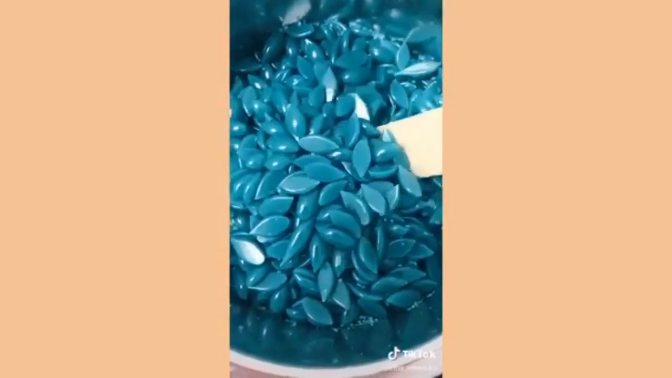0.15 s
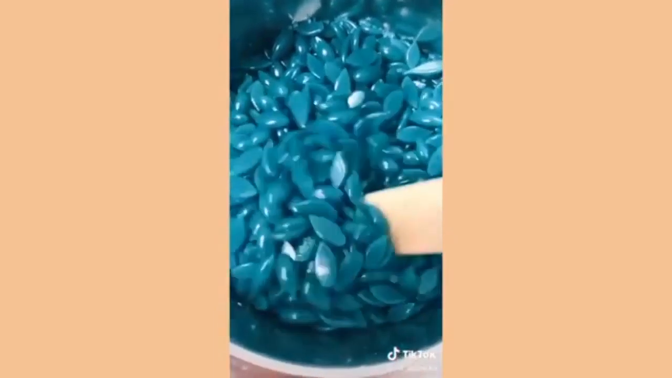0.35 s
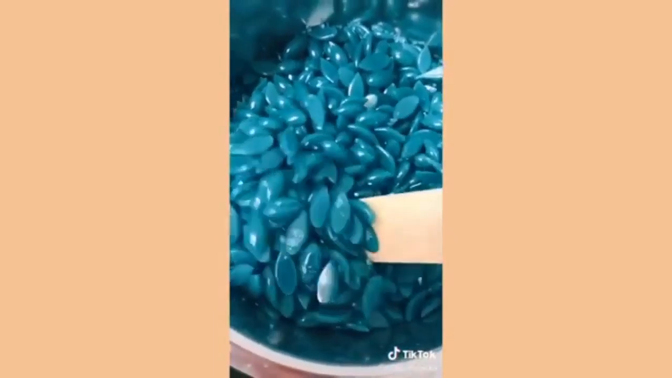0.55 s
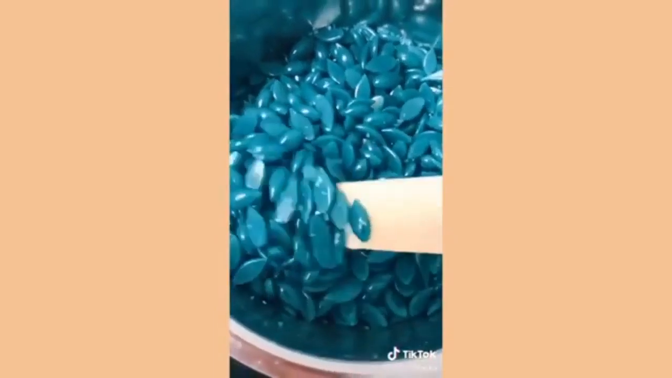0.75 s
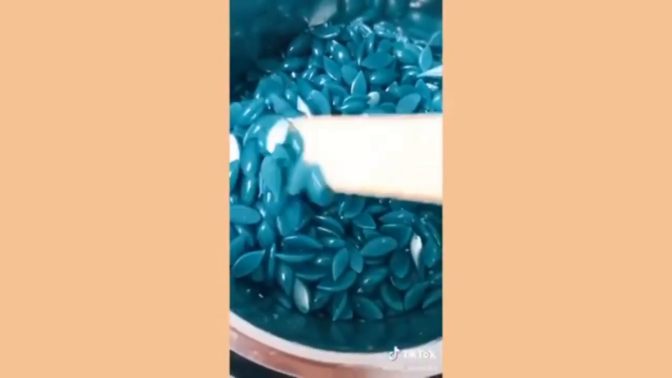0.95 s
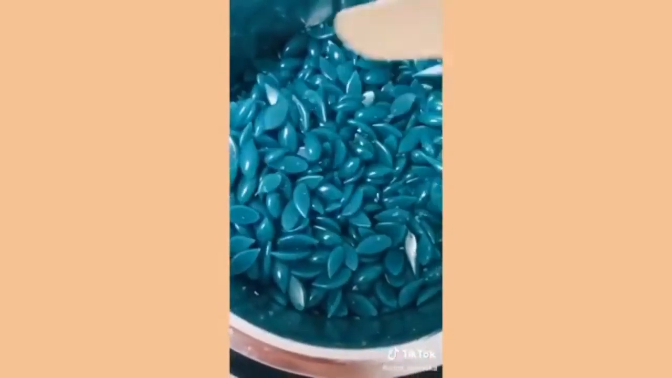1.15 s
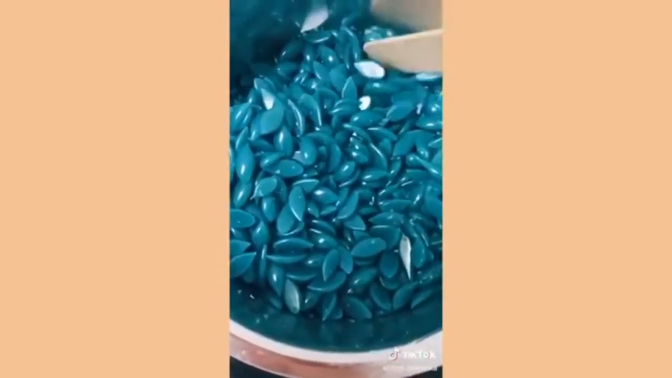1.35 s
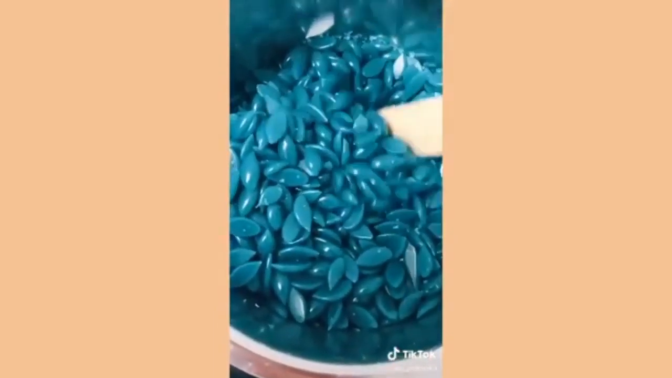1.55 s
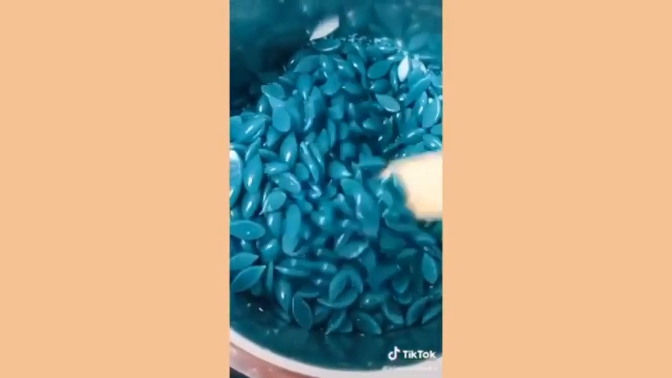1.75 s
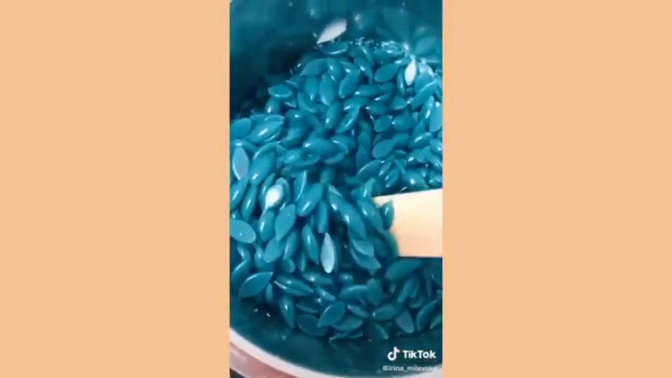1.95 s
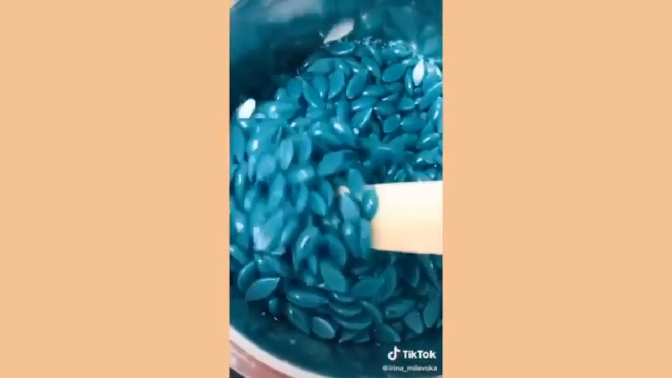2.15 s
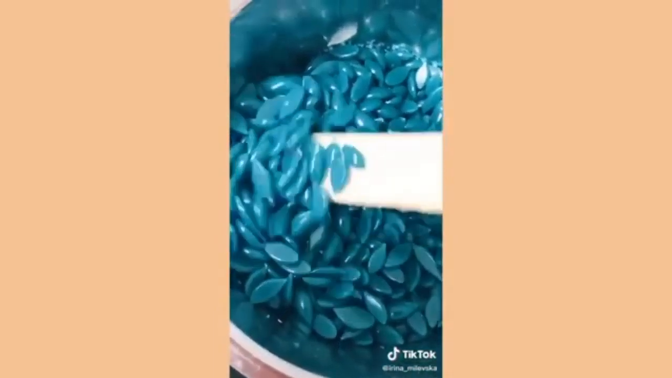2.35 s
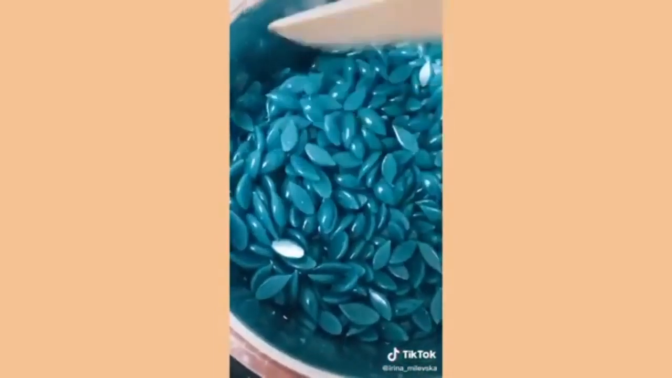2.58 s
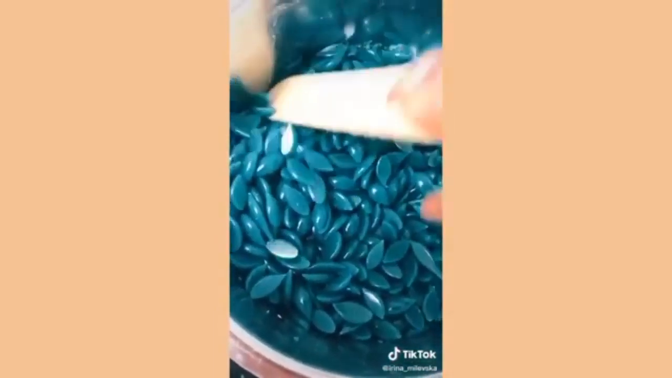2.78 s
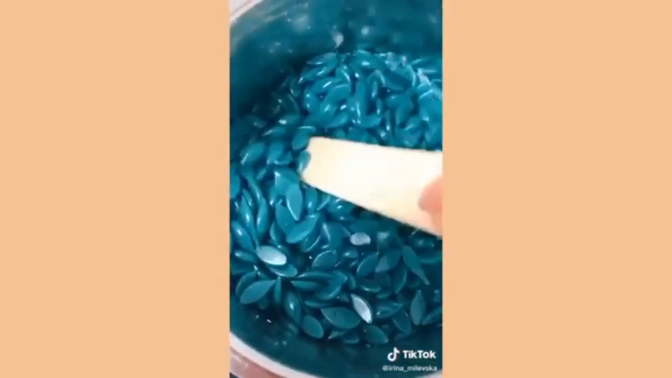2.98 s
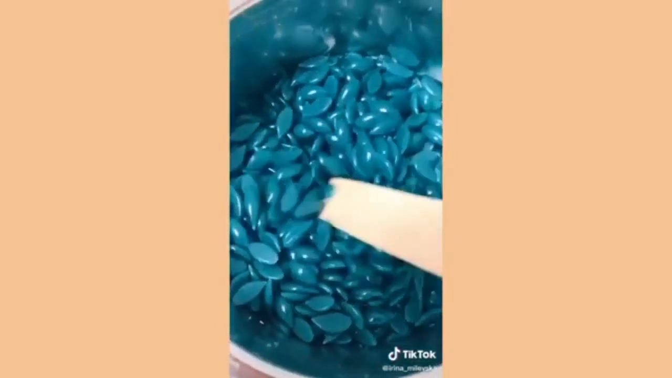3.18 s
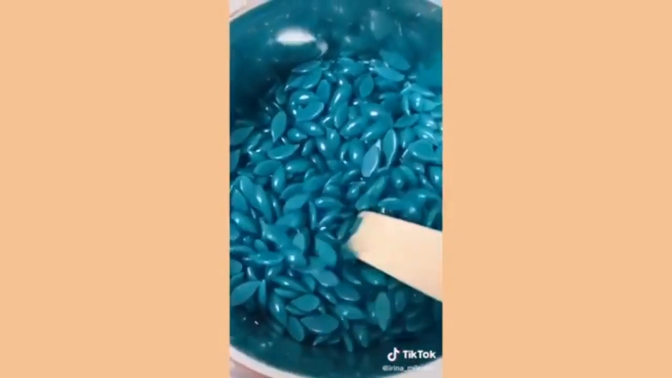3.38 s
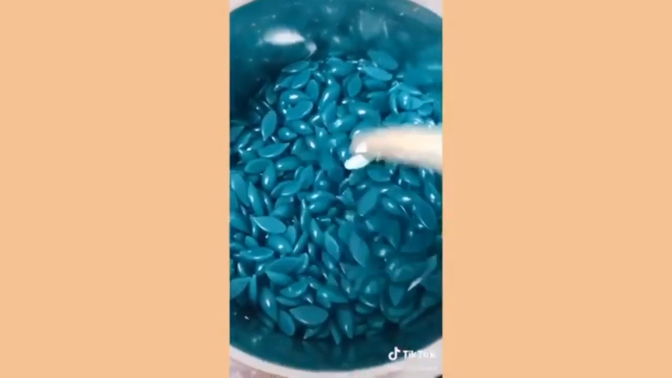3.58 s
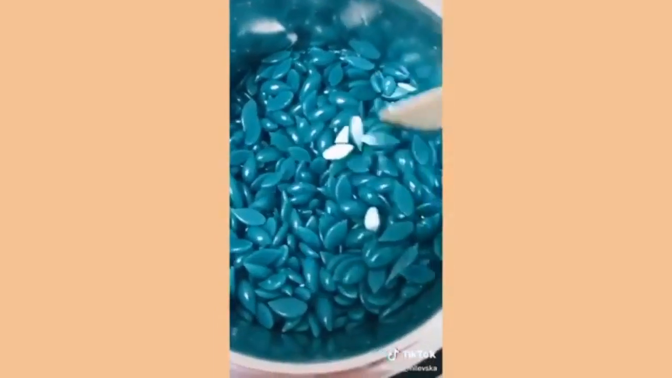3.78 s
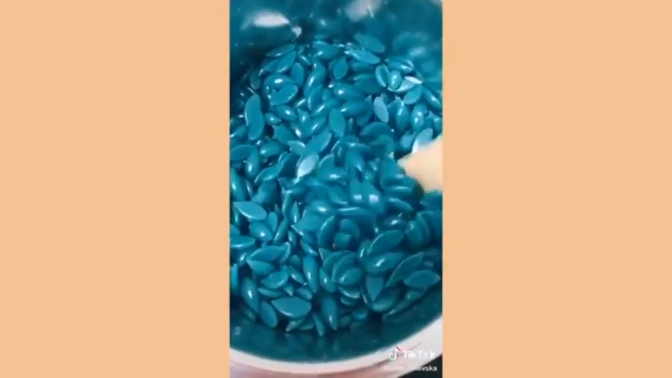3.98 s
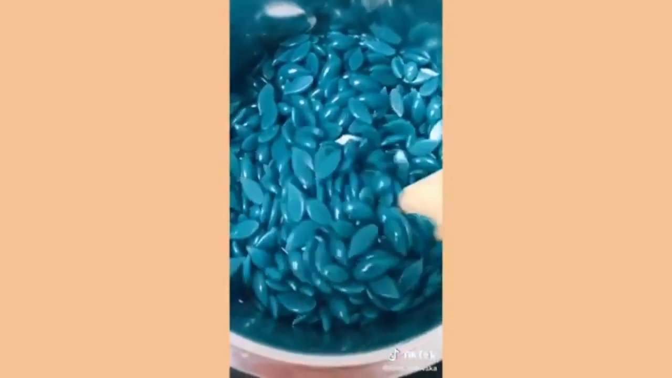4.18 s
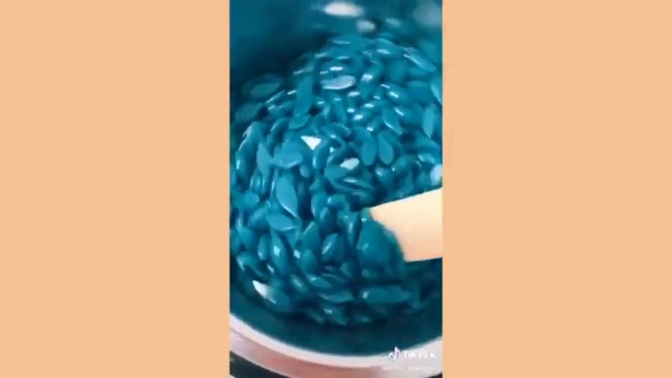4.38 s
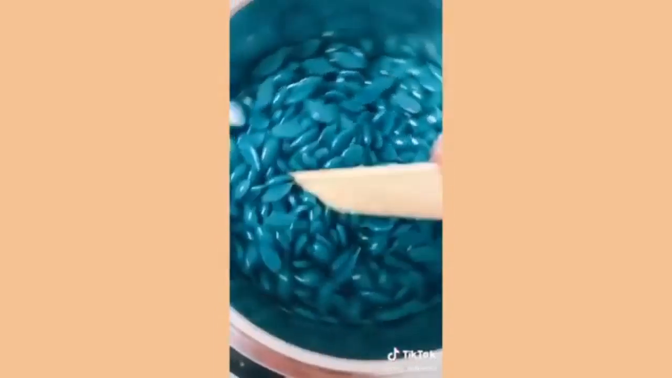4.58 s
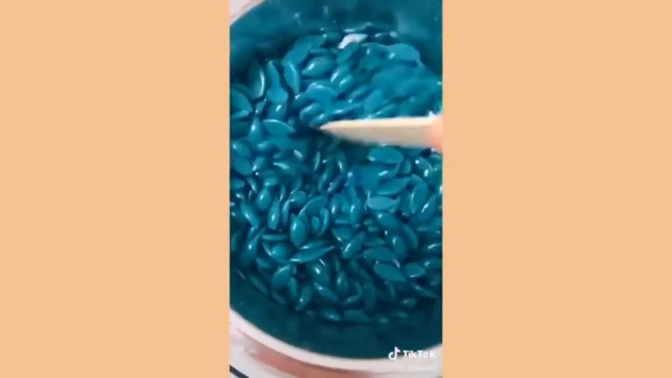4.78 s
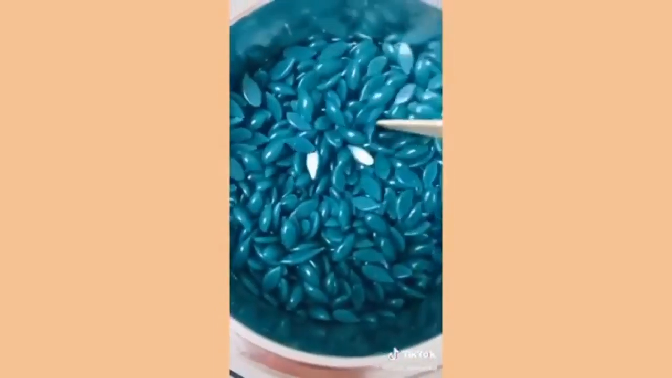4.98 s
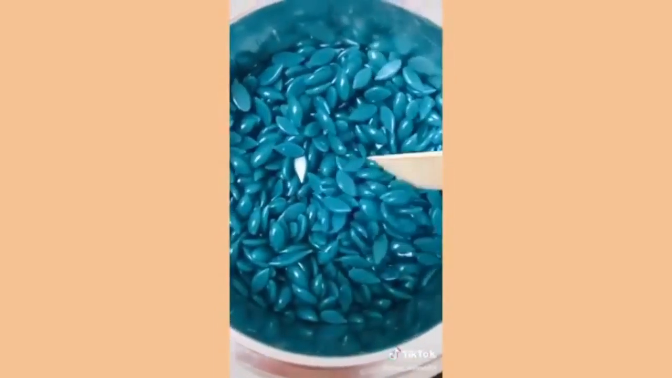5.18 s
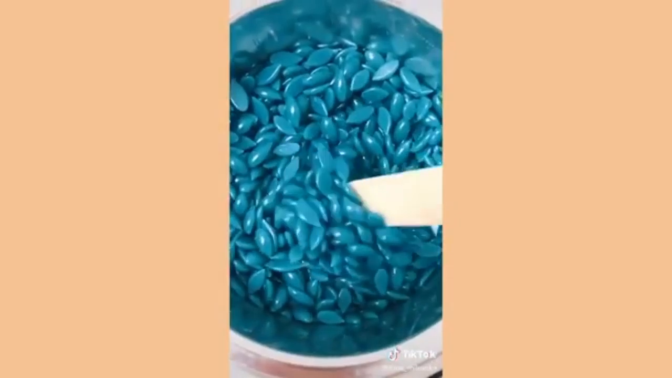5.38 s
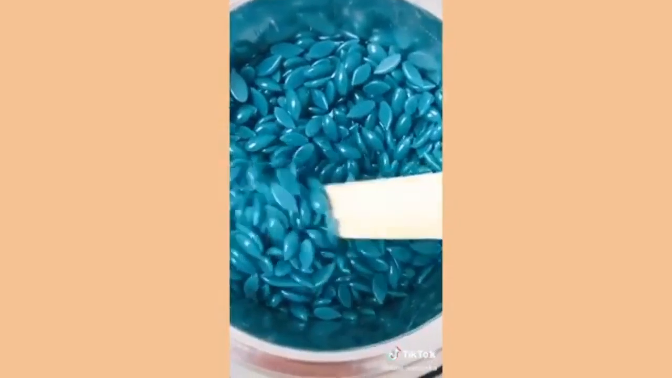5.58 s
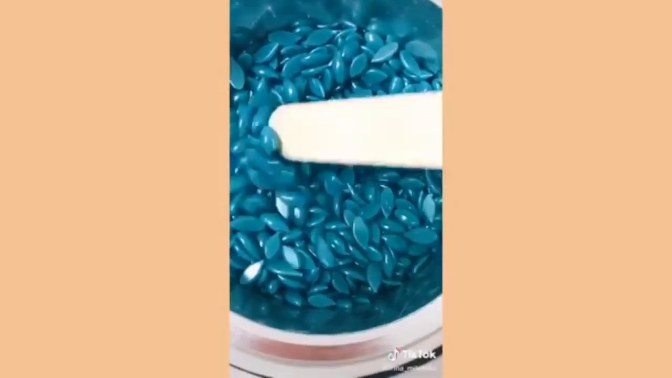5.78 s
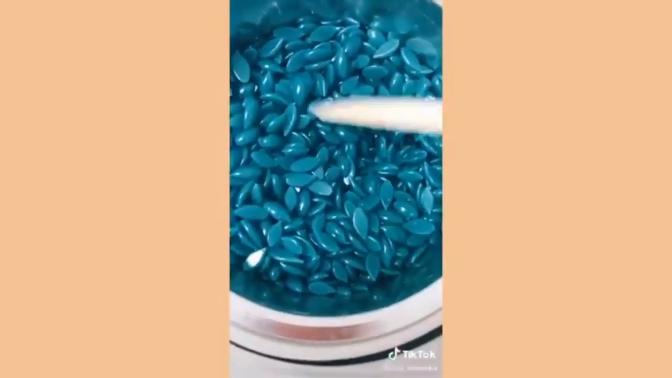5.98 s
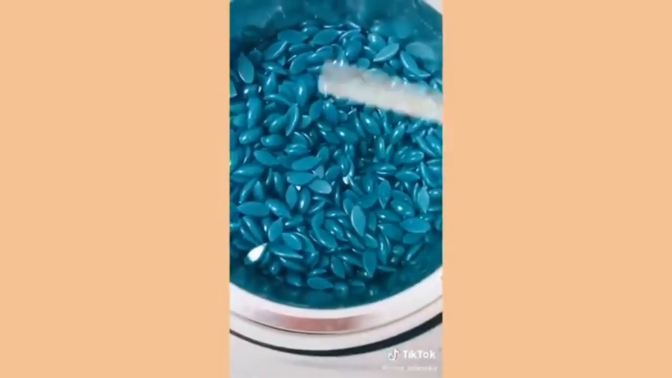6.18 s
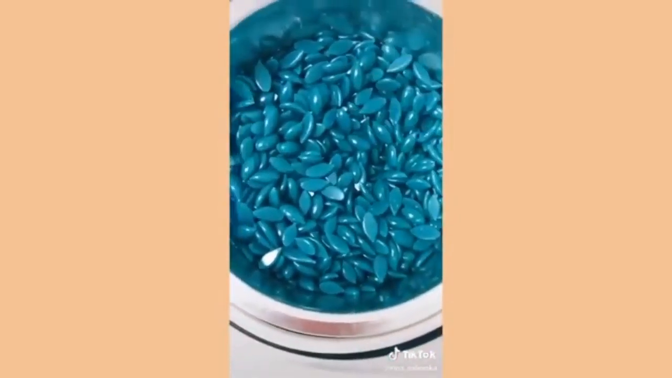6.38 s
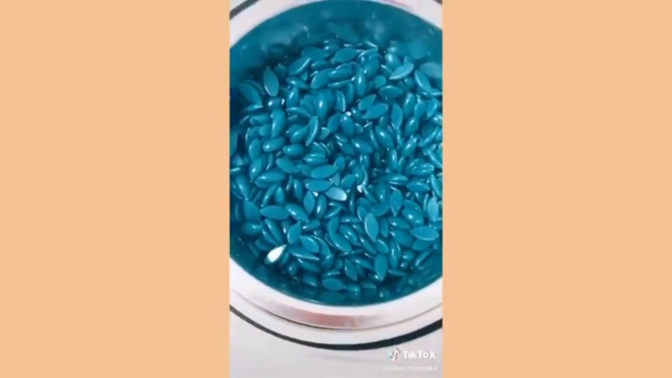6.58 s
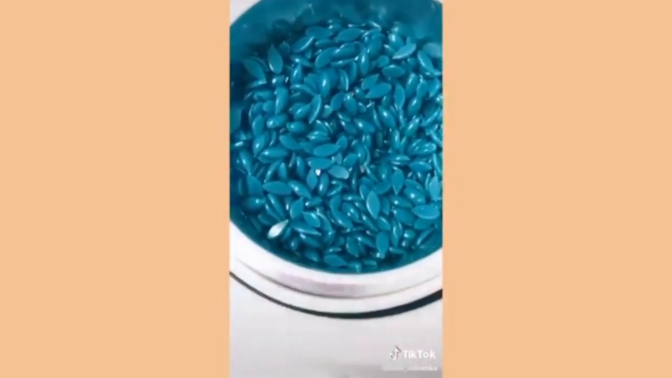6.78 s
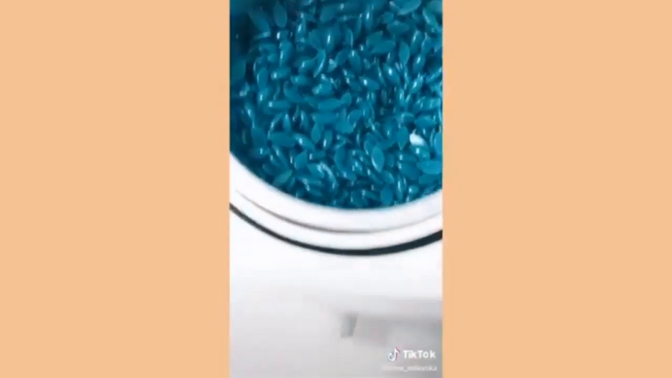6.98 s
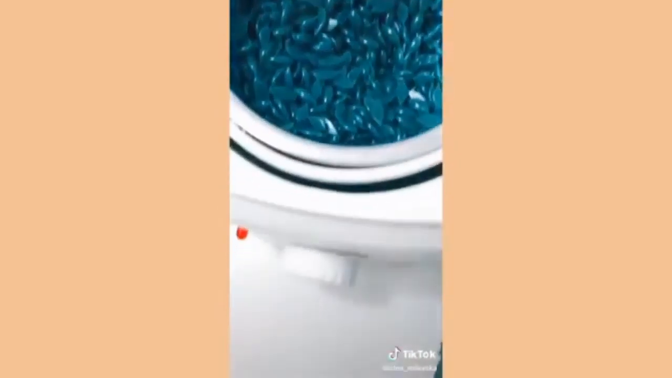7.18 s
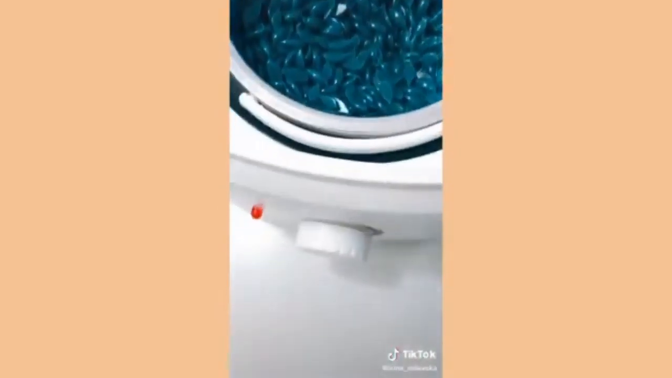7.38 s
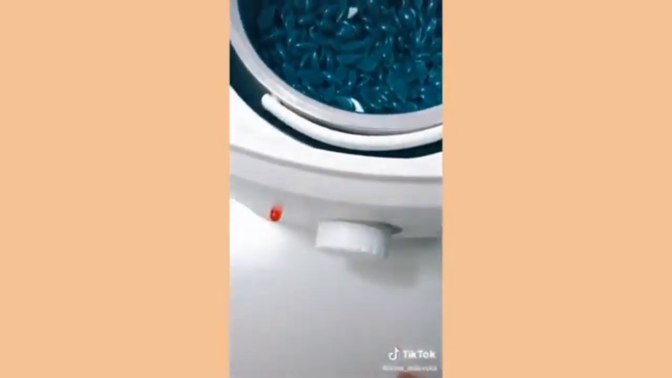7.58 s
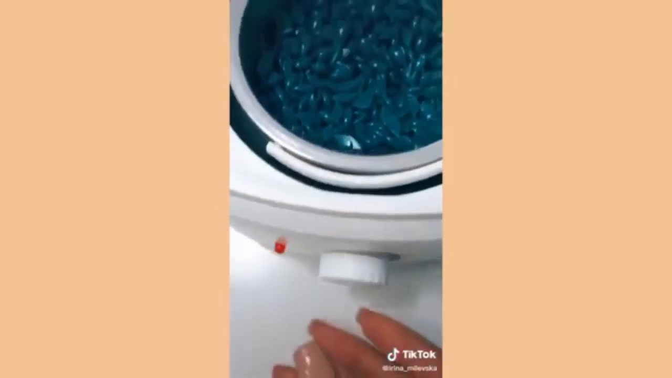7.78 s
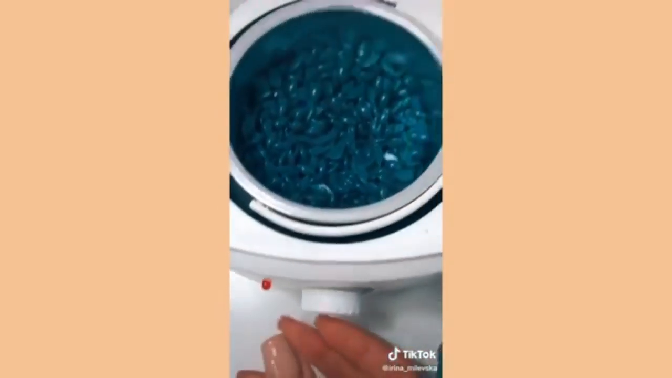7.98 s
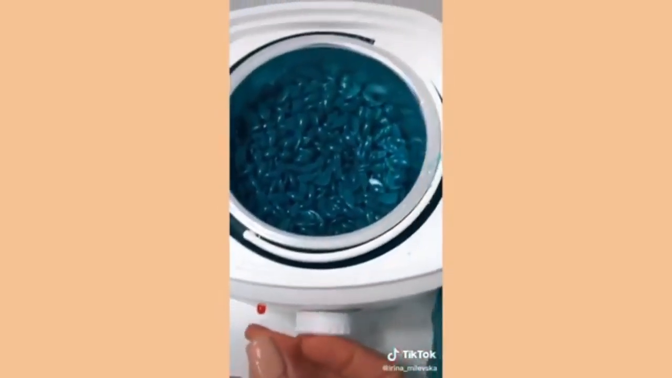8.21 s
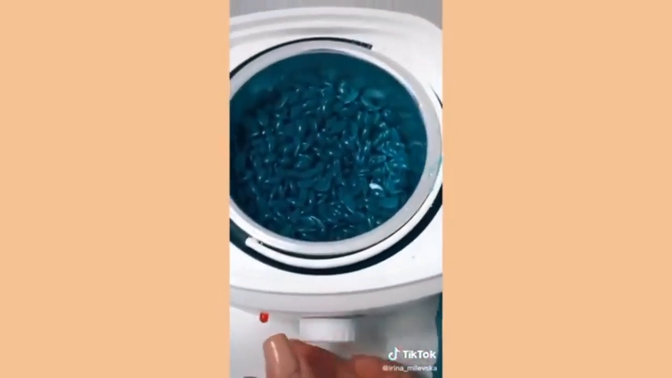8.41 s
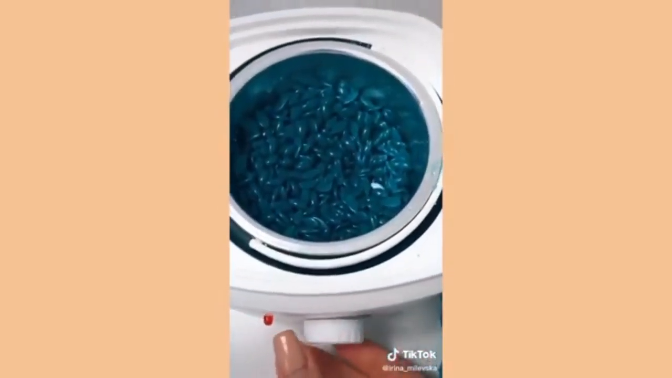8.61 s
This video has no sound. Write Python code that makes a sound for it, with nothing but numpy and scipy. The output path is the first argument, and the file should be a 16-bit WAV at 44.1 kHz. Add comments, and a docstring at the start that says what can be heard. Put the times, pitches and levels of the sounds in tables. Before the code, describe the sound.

Hard little beads are pushed around a metal pot in about ten strokes, each biting with a crunch and mostly fading, with scattered sharp clicks and dull rumbles. After six seconds it goes quiet apart from faint swishes. A bright, bouncing clack rings briefly, a hand brushes past, and a few hollow taps end it. Close microphone, small quiet room.

```python
"""In the bass-heavy air of a small room, a wooden spatula stirs hard wax beads in a warmer's metal pot.
From the start, strokes bite and mostly fade: swarms of collisions rustle, packed beads crunch and snap,
the pot rumbles and thumps in its low modes, and the blade now and then knocks on its wall.
After 5 s the flat of the blade rubs the beads, and the stirring stops near 6 s. The spatula lifts off with
soft swishes, light taps on the housing follow, and a hard clack at 7 s sets the shell ringing; a hand brushes past."""
import sys
import numpy as np
from scipy import signal
from scipy.fft import rfft, irfft
from scipy.io import wavfile
from scipy.ndimage import uniform_filter1d

SR = 44100
rng = np.random.default_rng(int(sys.argv[2]) if len(sys.argv) > 2 else 0)


def wrap_up_sound(samples):
    """Save the sound to the file named by the first command line argument, as 16-bit audio."""
    columns = np.atleast_2d(samples).T
    # keep every value between -1 and 1, then stretch to whole-number steps
    tamed = np.clip(columns, -1, 1)
    steps = np.round(tamed * 32767).astype(np.int16)
    wavfile.write(sys.argv[1], SR, steps)


N = 381465
T = np.arange(N) / SR
TICKS = np.arange(0, N / SR, .001)  # coarse time grid for the levels, in s
FILTER_SIZE = 4096
FREQS = np.maximum(np.fft.rfftfreq(FILTER_SIZE, 1 / SR), 1)
# hollow sound lies below the first edge, sparkle above the second
ZONE_EDGES_HZ = (3500, 9000)


def amp(db):
    """Level law: 20 dB is a factor of ten in amplitude."""
    return 10 ** (np.asarray(db) / 20)


def unit(x):
    """Energy normalisation: scale the sum of squares to 1."""
    return x / np.sqrt(np.sum(x ** 2))


def through(x, impulse):
    """Linear filtering: convolve a sound with an impulse response."""
    return signal.oaconvolve(x, impulse)[:len(x)]


def add(out, s, x):
    """Superposition: mix x into out at time s."""
    i = int(s * SR)
    out[i:i + len(x)] += x[:max(N - i, 0)]


def colour(points, peaks=()):
    """Spectral envelope: dB over FREQS from (f/Hz, level/dB) points and (f/Hz, width/Hz, level/dB) resonances."""
    hz, db = np.transpose(points)
    gain_db = np.interp(np.log(FREQS), np.log(hz), db)
    for f, width, peak_db in peaks:
        gain_db = gain_db + peak_db / (1 + (2 * (FREQS - f) / width) ** 2)
    return gain_db


def response(db):
    """Minimum phase: folding the cepstrum gives a causal impulse response, here of energy 1."""
    cepstrum = irfft(np.log(amp(db)))
    cepstrum[1:FILTER_SIZE // 2] *= 2
    cepstrum[FILTER_SIZE // 2 + 1:] = 0
    return unit(irfft(np.exp(rfft(cepstrum))))


def zones(db):
    """Band splitting: impulse responses for the hollow, middle and sparkling parts of a colour."""
    low, high = (1 / (1 + (FREQS / edge) ** 10) for edge in ZONE_EDGES_HZ)
    shares = (low, high - low, 1 - high)
    return [response(db + 10 * np.log10(share + 1e-7)) for share in shares]


def ring(modes, length_s):
    """Modal sum: exponentially decaying sines of alternating sign, from (f/Hz, level/dB, t60/s)."""
    t = np.arange(int(length_s * SR)) / SR
    total = 0
    for k, (hz, db, t60) in enumerate(modes):
        total = total + amp(db - 60 * t / t60) * np.sin(2 * np.pi * hz * t) * (-1) ** k
    return unit(total)


def walk(rate):
    """Random modulation: smoothed noise steps, rate per second, with standard deviation 1."""
    k = int(SR / rate)
    steps = np.repeat(rng.standard_normal(N // k + 1), k)
    x = uniform_filter1d(steps, k)[:N]
    return x / x.std()


def grains(rate, spread_db, decay_s):
    """Shot noise: the envelope of a swarm of tiny, uneven collisions, with a steady mean power."""
    sizes = amp(spread_db * np.minimum(rng.standard_normal(N), 2)) ** 2
    hits = (rng.random(N) < rate / SR) * sizes
    power = signal.lfilter([1], [1, -np.exp(-2 / (decay_s * SR))], hits) + 1e-9
    mean_power = uniform_filter1d(power, size=2200)
    return np.sqrt(power / np.maximum(mean_power, 1e-9))


def burst(shape):
    """Impulsive excitation: a brief crack of the given envelope, its energy spread evenly over frequency."""
    spectrum = rfft(shape * rng.standard_normal(len(shape)))
    local_power = uniform_filter1d(np.abs(spectrum) ** 2, size=44)
    return irfft(spectrum / np.sqrt(local_power), len(shape))


def drift(db_spread, width_hz):
    """Spectral irregularity: a random, smooth ripple over FREQS, so that no two contacts ring alike."""
    return db_spread * np.interp(FREQS, np.arange(40) * width_hz, rng.standard_normal(40))


def contacts(table, body_db, rise_s, decay_s, chatter_s, chatter_db, ripple_db, grind, lean):
    """Impact excitation: each contact may grind for an instant, cracks, and leaves a weaker chatter behind."""
    lead_s = .008  # room for the grind before the crack
    t = np.arange(SR // 30) / SR - lead_s
    after = np.maximum(t, 0)
    crack_shape = (1 - np.exp(-after / rise_s)) * np.exp(-after / decay_s)
    chatter = amp(chatter_db) * np.exp(-np.abs(t) / chatter_s) * np.where(t < 0, grind, 1)
    shape = crack_shape + chatter
    window = np.sqrt(.004 * SR)  # levels refer to the energy spread over 4 ms
    octaves = np.log2(np.clip(FREQS, 700, 5000) / 700)
    out = np.zeros(N)
    for s, db, hollow_db, sparkle_db, *_ in table:
        shares = unit(amp([hollow_db, 0, sparkle_db]))
        # with lean above 0, hollow contacts lean towards the lowest resonances
        tilt_db = lean * max(hollow_db, 0) * octaves
        parts = zones(body_db + drift(ripple_db, width_hz=550) - tilt_db)
        crack = sum(g * unit(through(burst(shape), part)) for g, part in zip(shares, parts))
        add(out, s - lead_s, amp(db) * window * crack)
    return out


# Colour of the air of the room: f/Hz, relative level/dB
AIR_COLOUR = [(20, -26.5), (32, -18.5), (50, 0.5), (150, -1), (220, -5.5), (430, -16), (770, -17.5),
              (1800, -22.5), (4000, -28), (12800, -34), (15000, -35.5)]


def room_tone():
    """Stationary noise: the quiet, bass-heavy air of the room, wandering slightly in level."""
    air = through(rng.standard_normal(N), response(colour(AIR_COLOUR)))
    return air * amp(-63 + .5 * walk(14.0))


def room(x, wet_db, t60_s, treble_t60_s, treble_db):
    """Diffuse reverberation: a tail of decaying noise in which the treble dies sooner."""
    t = np.arange(SR) / SR
    decays_s = (t60_s, (t60_s + treble_t60_s) / 2, treble_t60_s)
    levels_db = (0, treble_db / 2, treble_db)
    tail = 0
    for part, t60, db in zip(zones(0 * FREQS), decays_s, levels_db):
        tail = tail + through(rng.standard_normal(SR), part) * amp(db - 60 * t / t60)
    onset = np.clip(t / 0.0033 - .5, 0, 1)
    return x + amp(wet_db) * through(x, unit(tail * onset))


def push(start, length, attack_s, release_s, fade_db=0):
    """Driven envelope over TICKS: a push bites, changes by -fade_db per s, and dies when the blade stops."""
    t = TICKS - start
    attack = np.clip(t / attack_s, 0, 1)
    fade = amp(-fade_db * np.clip(t, 0, length))
    return attack * fade * np.exp(-np.maximum(t - length, 0) / release_s)


# Strokes of the spatula through the beads; shares are relative to the middle zone, a negative fade swells:
# t/s, length/s, rustle level/dB, fade/(dB/s), hollow share/dB, sparkle share/dB, rumble level/dB
STROKE_EVENTS = [(0.012, 0.15, -43.5, 11, 1.5, -3, -50.5), (0.254, .846, -37, 14.5, -1, -0.5, -50.5),
                 (1.345, 0.39, -42, 5.5, 1, -0.5, -44.5), (1.765, 0.51, -40.5, 19, 2, 0.5, -46),
                 (2.19, 0.46, -36, 36, -0.5, -1, -44), (2.774, .875, -37.5, 7, -2.5, 0, -49),
                 (3.763, 0.41, -43, -10, 0.5, 0.5, -49.5), (4.237, 0.31, -36, 29.5, 0.5, -2.5, -37),
                 (4.578, 0.62, -39.5, 7, -3, 0, -53.5), (5.268, 0.61, -45, 7.5, 1, 1.5, -53)]
STROKE_ATTACK_S, STROKE_RELEASE_S = 0.0092, 0.046
# Packed beads give way in a crunch: t/s, length/s, level/dB, hollow share/dB, sparkle share/dB
CRUNCH_EVENTS = [(0.028, 0.051, -27.5, -9.5, -5.5), (0.257, .068, -27, -11.5, -6.5),
                 (0.6, 0.021, -33, -16, -2), (0.698, 0.026, -35, -5.5, -2), (1.334, 0.025, -41.5, 1, -6.5),
                 (1.388, 0.0061, -29, 2, -2.5), (1.477, 0.018, -30, 2.5, 2), (1.778, 0.065, -31, -3, -3),
                 (2.244, 0.051, -39.5, -5, -16), (2.409, 0.048, -37.5, -10, -1),
                 (2.787, 0.041, -32.5, -28, -6.5), (2.92, 0.031, -31.5, -3.5, 3.5),
                 (2.999, .043, -32, -12, 3.5), (3.52, 0.054, -41, -12.5, -5.5),
                 (3.919, 0.064, -34.5, -5.5, -4.5), (4.058, 0.042, -30.5, -0.5, -2),
                 (4.587, 0.055, -39, -5.5, -18.5), (4.836, 0.095, -31, -10, 0.5),
                 (5.134, 0.03, -30.5, -0.5, -1.5), (5.265, .025, -39, -7, -17), (5.64, 0.17, -37, -5, -8)]
CRUNCH_ATTACK_S, CRUNCH_RELEASE_S, CRUNCH_RUMBLE_DB = .009, .015, -20


def stirring():
    """Power addition: strokes and crunches sum to levels in dB of hollow, middle, sparkle and pot rumble."""
    power = 1e-12
    for s, length, db, fade_db, hollow_db, sparkle_db, rumble_db in STROKE_EVENTS:
        envelope = push(s, length, STROKE_ATTACK_S, STROKE_RELEASE_S, fade_db)
        levels = amp([db + hollow_db, db, db + sparkle_db, rumble_db])
        power = power + np.outer(levels, envelope) ** 2
    for s, length, db, hollow_db, sparkle_db in CRUNCH_EVENTS:
        envelope = push(s, length, CRUNCH_ATTACK_S, CRUNCH_RELEASE_S)
        levels = amp(db) * amp([hollow_db, 0, sparkle_db, CRUNCH_RUMBLE_DB])
        power = power + np.outer(levels, envelope) ** 2
    return 10 * np.log10(power)


# Colour of the beads in the pot: f/Hz, relative level/dB
BEAD_COLOUR = [(40, -46), (300, -14.5), (520, -18.5), (700, -11), (860, 0), (1200, 0.5), (1700, -7),
               (2100, -4), (2600, -3.5), (4700, -5), (5700, 1), (7600, -3.5), (10300, -7.5), (13000, -2),
               (15500, -9)]
# Resonances of the pot: f/Hz, width/Hz, level/dB
POT_RESONANCES = [(2635, 570, 6), (3640, 160, 5), (4390, 76, 4.5), (5510, 450, 2.5), (8850, 790, 4)]


def rustle(levels_db, gain_db, flicker_db, clumps_per_s, clump_db):
    """Granular friction: beads tumble and slide over each other, with fewer collisions in a weaker push."""
    clumps_db = clump_db * np.clip(walk(clumps_per_s), -2, 1)  # the beads move in fits and starts
    levels_db = [np.interp(T, TICKS, db) + clumps_db for db in levels_db]
    collisions_per_s = np.clip(750 * amp(.4 * (levels_db[1] + 40)), 250, 1300)
    # a constant floor joins the separate ticks
    swarm = np.hypot(grains(collisions_per_s, spread_db=4.5, decay_s=0.0013), amp(-4))
    out = 0
    for level_db, part in zip(levels_db, zones(colour(BEAD_COLOUR, POT_RESONANCES))):
        # each zone flickers by itself, so the brightness keeps changing
        force = swarm * amp(flicker_db * walk(400)) * rng.standard_normal(N)
        out = out + through(force * amp(level_db + gain_db), part)
    return out


# Colour of the pot's rumble: f/Hz, relative level/dB
RUMBLE_COLOUR = [(25, -49.5), (60, -16), (100, -9.5), (148, 4), (168, -6.5), (188, 3.5), (240, -12),
                 (298, -6), (420, -24), (800, -32)]


def rumble(level_db):
    """Structure-borne sound: the push of the blade reaches the pot as dull, uneven bumps."""
    force = grains(rate=140, spread_db=4.5, decay_s=0.0096) * rng.standard_normal(N)
    return through(force * amp(np.interp(T, TICKS, level_db)), response(colour(RUMBLE_COLOUR)))


def pot_walls(x):
    """Comb filtering: short echoes off blade and wall shift as the beads move, varying the colour."""
    out = x
    for lag_s, sway_s, share in ((.00022, .00005, .17), (.0013, .0002, -.2)):
        out = out + share * np.interp(T - lag_s - sway_s * walk(4), T, x)
    return out


# Beads snapping free or hitting the pot; shares are relative to the middle zone:
# t/s, level/dB before gain, hollow share/dB, sparkle share/dB
SNAP_EVENTS = [(0.0401, -19, -14.5, -9.5), (0.1367, -33, 3, -9), (0.22, -29.5, -3, 4),
               (0.261, -16.5, -20, -5), (0.297, -34, -10, -9.5), (0.4382, -29, -11, -17),
               (0.5812, -28.5, -23, -2), (0.7163, -22.5, -10, -9), (0.7592, -20.5, -20, 1.5),
               (0.8614, -32.5, -9, -12), (0.9092, -32.5, -10, -2), (1.0235, -33, -11.5, 2.5),
               (1.209, -48.5, 1, 3), (1.2195, -45, 3, 1), (1.301, -52, -6.5, 6.5), (1.341, -27.5, 8, -8),
               (1.354, -31, -4.5, -4.5), (1.3693, -22.5, -3, -10), (1.4008, -10.5, -5.5, 1.5),
               (1.4421, -32, -17, -1.5), (1.457, -27, -10, -4), (1.4865, -19, -14, 3.5),
               (1.4997, -15.5, 11, -6), (1.5129, -19.5, -10, 4), (1.5355, -19, -8.5, 1),
               (1.614, -25.5, -6.5, -10), (1.6694, -26.5, -4.5, .5), (1.7877, -22, -7.5, -2),
               (1.9799, -27, -14, 19), (2.0977, -30, -2, -11), (2.1908, -28.5, 1, -14),
               (2.3442, -30, -10, -5), (2.3823, -28, -22, -8), (2.4501, -28, -25, -5),
               (2.4712, -20, -13, 1), (2.5966, -25.5, -26, -4), (2.6358, -29, -27, -5),
               (2.7434, -44.5, 4, 4), (2.7655, -34, 3, -6), (2.7736, -27.5, -10, -8),
               (2.7844, -21.5, -16, 4), (2.8602, -22, -28, -6), (2.9039, -23, -17, 3),
               (3.0013, -20, -8.5, 2), (3.0397, -19, -17, 8.5), (3.0826, -22, -18, 1),
               (3.1593, -30, -11, -11.5), (3.2304, -27, -9, 2), (3.2593, -27.5, -7.5, 4),
               (3.348, -26.5, -7, -4.5), (3.4753, -34.5, -6.5, -0.5), (3.5553, -22, -16, 0),
               (3.8032, -26, -3.5, -5), (3.8619, -20.5, -6, 3), (3.8833, -27, -5.5, -2.5),
               (4.0513, -17, -6, 1), (4.067, -25, 8, 7), (4.1902, -29, 3, 4), (4.4376, -28, -12, -1),
               (4.5944, -18.5, -24, -2), (4.6152, -20, -11, -2), (4.8527, -20.5, 5, 15),
               (4.8671, -24.5, -14, -2.5), (4.8827, -20, -17, -2), (4.912, -22, -7, -6),
               (5.1305, -25, 9, -3), (5.155, -23.5, 3, -6), (5.25, -36.5, -8, -9), (5.2816, -28.5, -14, -7),
               (5.2989, -30.5, 0, -8), (5.3991, -26.5, -6, -2), (5.4818, -31.5, 7, -4),
               (5.699, -24, -14, 7), (5.8074, -34, -20, -11), (6.002, -48, 8, 13)]


def snaps(table):
    """Sudden release: jammed beads crack free with the colour of the pot."""
    return contacts(table, colour(BEAD_COLOUR, POT_RESONANCES), rise_s=0.00047, decay_s=0.00048,
                    chatter_s=0.0026, chatter_db=-21, ripple_db=4.5, grind=.25, lean=0)


# Lesser snaps come by chance: rate per s, level above the rustle in dB, unevenness in dB
STRAY_PER_S, STRAY_DB, STRAY_SPREAD_DB = 20, 5, 3


def stray_snaps(rustle_db, hollow_db, sparkle_db, colour_spread_db):
    """Random point process: rows like SNAP_EVENTS for lesser snaps, whose level follows the push."""
    first, last = STROKE_EVENTS[0][0], STROKE_EVENTS[-1][0] + STROKE_EVENTS[-1][1]
    chance = rng.standard_normal((int(STRAY_PER_S * (last - first)), 4))
    times = first + (np.arange(len(chance)) + 2 * chance[:, 0]) / STRAY_PER_S
    rows = []
    for s, (_, size, hollow, sparkle) in zip(times, chance):
        if first < s < last:
            level_db = np.interp(s, TICKS, rustle_db) + STRAY_DB + STRAY_SPREAD_DB * min(size, 1)
            rows.append((s, level_db, hollow_db + colour_spread_db * hollow,
                         sparkle_db + colour_spread_db * sparkle))
    return rows


# The jammed blade lurches and bumps the pot: t/s, level/dB before gain
BUMP_EVENTS = [(0.316, -37), (1.371, -39), (1.425, -37), (1.5, -37), (2.071, -32.5), (2.18, -38.5),
               (3.725, -39.5), (4.262, -30.5), (4.377, -28.5), (4.462, -38.5), (5.17, -38), (5.224, -40),
               (5.576, -38.5)]
# Low modes of the pot: f/Hz, relative level/dB, t60/s
LOW_POT_MODES = [(84.3, -9.5, .14), (116, -5, 0.15), (150, -2.5, 0.49), (190.5, -2.5, 0.13), (307, -7, .12)]


def bumps(gain_db):
    """Modal excitation: each lurch of the blade thumps the low modes of the pot."""
    out = np.zeros(N)
    for s, db in BUMP_EVENTS:
        add(out, s, amp(db + gain_db) * ring(LOW_POT_MODES, .25))
    return out


# The spatula knocks on the pot: t/s, level/dB before gain
KNOCK_EVENTS = [(1.3397, -22.5), (3.7236, -6.5), (5.1546, -42)]
# Modes of the knock: f/Hz, relative level/dB, t60/s
WOOD_MODES = [(905, -14, 0.028), (1110, -15, 0.042), (1865, -4, 0.012), (2290, -2, 0.017), (2830, 0, 0.015),
              (3220, -4, 0.007), (4200, -6.5, 0.012), (5600, -14.5, 0.0077), (7450, -11.5, 0.0051),
              (12100, -6.5, .004)]


def knocks(gain_db):
    """Damped impact: the wooden blade strikes the pot wall and its modes die within milliseconds."""
    out = np.zeros(N)
    for s, db in KNOCK_EVENTS:
        add(out, s, amp(db + gain_db) * ring(WOOD_MODES, .06))
    return out


# The flat of the blade smooths the beads: t/s, level/dB
SMOOTHING_LEVELS = [(5.26, -72), (5.4, -39), (5.6, -42.5), (5.75, -41.5), (5.9, -49), (6.02, -63),
                    (6.05, -101)]
# Resonances of the blade: f/Hz, width/Hz, level/dB
BLADE_RESONANCES = [(900, 150, 10), (1250, 320, 8.6), (2560, 362, 17), (3580, 580, 16), (7040, 700, 18)]


def smoothing():
    """Friction-driven resonance: beads rub along the flat of the blade and set the wood ringing."""
    level_db = np.interp(T, *np.transpose(SMOOTHING_LEVELS), left=-120, right=-120)
    rub = grains(rate=500, spread_db=3.5, decay_s=.0012) * rng.standard_normal(N)
    wood_db = colour([(400, -18), (900, 7.0), (7000, -6), (15000, -7)], BLADE_RESONANCES)
    return through(rub * amp(level_db), response(wood_db))


# Soft swishes: the spatula lifts off, then a hand brushes past: t/s, rise/s, fall/s, level/dB, centre f/Hz
SWISH_EVENTS = [(6.25, .035, 0.072, -58, 9450), (6.45, 0.032, .06, -68.5, 7000),
                (6.95, 0.057, 0.035, -54.5, 1200), (7.458, 0.03, 0.11, -58.5, 1230),
                (7.481, 0.045, 0.065, -63, 6450), (8.084, 0.014, 0.028, -61.5, 2290),
                (8.231, 0.026, 0.045, -65, 2270), (8.354, 0.012, 0.012, -63.5, 2570)]


def swishes(slope_db):
    """Band-limited friction noise: soft, broad swishes swell and fade, catching slightly as they slide."""
    out = np.zeros(N)
    t = np.arange(-SR // 2, SR // 2) / SR
    catching = np.hypot(grains(rate=400, spread_db=4, decay_s=.002), 1) / np.sqrt(2)
    for s, rise, fall, db, hz in SWISH_EVENTS:
        swell = np.exp(-(np.minimum(t, 0) / rise) ** 2 - np.maximum(t, 0) / fall)
        band = response(-slope_db * np.log(1 + np.log2(FREQS / hz) ** 2))
        add(out, s + t[0], amp(db) * swell * through(rng.standard_normal(len(t)), band))
    return out * catching


# Light taps on the plastic housing; levels before gain, thud share relative to the tap:
# t/s, level/dB, hollow share/dB, sparkle share/dB, thud share/dB
TAP_EVENTS = [(6.2497, -50, -11, 6, -25), (6.8880, -34, 24, -21, -33), (6.9380, -62, 20, -11, -22),
              (6.9683, -47.5, 6, -5, -25), (7.646, -52.5, 0, -14, -25), (7.6967, -30.5, -4.5, -12, -11),
              (8.067, -61, 5.5, -10.5, -14), (8.0719, -47.5, 17, -12.5, -8), (8.3455, -61, 15, -13, -25),
              (8.3590, -64, 8, -15, -27), (8.5730, -37.5, -3, -12, -3), (8.585, -43.5, 10.5, -16, -15)]
# Colour of the housing: f/Hz, relative level/dB
HOUSING_COLOUR = [(100, -28.5), (300, -14), (500, -4), (750, 0), (1100, -1), (1600, -0.5), (2500, -1.5),
                  (3500, -7.5), (5500, -4), (7500, -16.5), (10000, -21), (15000, -18.5)]
# Modes of the housing: f/Hz, relative level/dB, t60/s
HOUSING_BODY_MODES = [(188, -2.5, 0.38), (235, -6, 0.11), (312, 0, 0.068), (410, -1.5, .08),
                      (2550, -5, 0.13), (3450, -4.5, 0.11)]


def taps(gain_db, thud_db):
    """Impact and modal response: light taps tick on the housing and set its hollow body going."""
    thuds = np.zeros(N)
    for s, db, _, _, share_db in TAP_EVENTS:
        add(thuds, s, amp(db + share_db + thud_db) * ring(HOUSING_BODY_MODES, .5))
    ticks = contacts(TAP_EVENTS, colour(HOUSING_COLOUR), rise_s=.0004, decay_s=.0012,
                     chatter_s=.005, chatter_db=-19, ripple_db=1.5, grind=0, lean=.15)
    return thuds + amp(gain_db) * ticks


# A hard clack and its rebounds: t/s, level/dB before gain, hollow share/dB, sparkle share/dB
CLACK_EVENTS = [(7.0258, -32.5, 7, -6), (7.0335, -7.5, -9.5, 3.5), (7.047, -32, 1, -2),
                (7.072, -46, -3, -7), (7.113, -28.5, -2, -10), (7.1355, -21.5, -5, 7),
                (7.1395, -20, -5.5, 6.5), (7.159, -25, -12, 3.5), (7.1712, -35, -2, 3),
                (7.1932, -35, -1, -7)]
# Colour of the warmer's shell: f/Hz, relative level/dB
SHELL_COLOUR = [(80, -19.5), (180, 2.5), (260, -17.5), (370, 6), (520, -9), (750, -3.5), (1500, -4.5),
                (2200, -1), (4000, -3.5), (5500, 2), (9000, 1.5), (15000, -2.5)]
# Modes of the shell: f/Hz, relative level/dB, t60/s
SHELL_RING_MODES = [(367, -11, 0.82), (1050, -1, .4), (1520, -5, .35), (2080, 0, .4), (2170, -7, 0.33),
                    (2760, -11.5, .4), (3330, -7.5, 0.34), (4670, -6, 0.27), (5160, -2, .3),
                    (5900, -6.5, .3), (7068, -9.5, .3), (9150, -2.5, .3)]


def clack(gain_db, ring_db):
    """Rebounding impact: each blow buzzes briefly and excites the modes of the shell, which ring on."""
    blows = contacts(CLACK_EVENTS, colour(SHELL_COLOUR), rise_s=0.00063, decay_s=0.0012,
                     chatter_s=0.0029, chatter_db=-6, ripple_db=2.5, grind=0.65, lean=0)
    hits = amp(gain_db) * blows
    return hits + amp(ring_db) * through(hits, ring(SHELL_RING_MODES, .8))


def scene():
    """Direct and reverberant sound: the stirred pot close by, then the warmer handled, in a small room."""
    hollow_db, middle_db, sparkle_db, rumble_db = stirring()
    beads = rustle((hollow_db, middle_db, sparkle_db), gain_db=-2.0, flicker_db=2.0,
                   clumps_per_s=45, clump_db=0.9)
    beads = beads + amp(-0.5) * snaps(SNAP_EVENTS)
    beads = beads + snaps(stray_snaps(middle_db, hollow_db=-7.5, sparkle_db=-1.5, colour_spread_db=3.5))
    pot = pot_walls(beads) + rumble(rumble_db) + bumps(gain_db=24.5) + knocks(gain_db=14.0) + smoothing()
    # the pot faces the microphone, while the warmer's body is heard more through the room
    near = room(pot, wet_db=-22, t60_s=.36, treble_t60_s=.28, treble_db=-2)
    body = taps(gain_db=-0.5, thud_db=23.5) + clack(gain_db=-1, ring_db=-20.0)
    far = room(body, wet_db=-12.0, t60_s=0.45, treble_t60_s=0.37, treble_db=-7.5)
    return (near + far + swishes(slope_db=8.5) + room_tone())[None]


def record(dry):
    """Peak limiting and low-pass: the highest peaks are held below full scale, the treble ends above 15.3 kHz."""
    limited = np.clip(dry, -.62, .62)
    lowpass = signal.ellip(10, .2, 70, 15300, fs=SR, output="sos")
    return signal.sosfilt(lowpass, limited)


dry = scene()
out = record(dry)
wrap_up_sound(out)
```